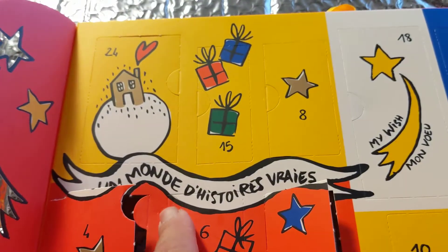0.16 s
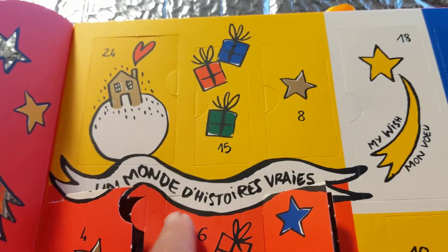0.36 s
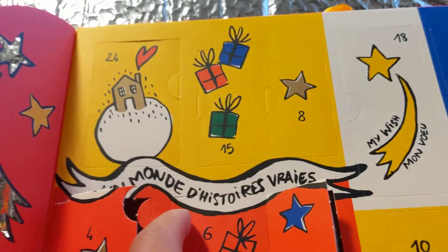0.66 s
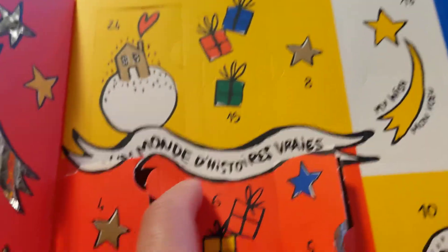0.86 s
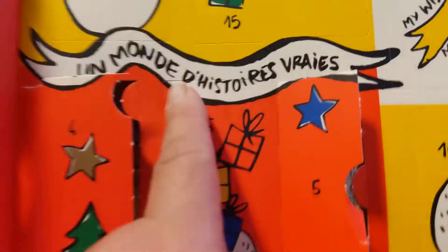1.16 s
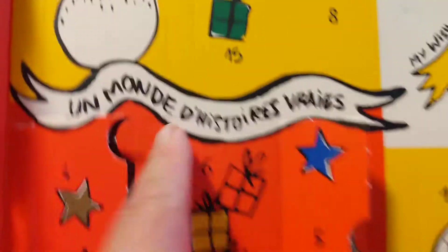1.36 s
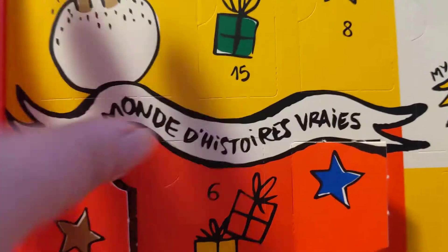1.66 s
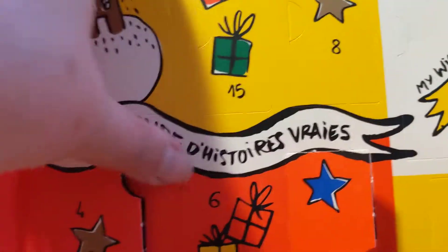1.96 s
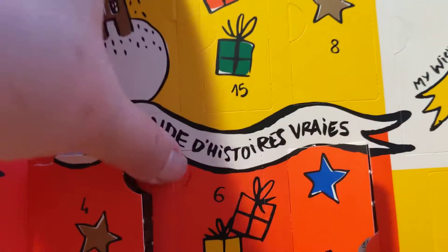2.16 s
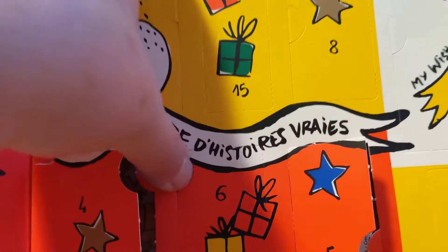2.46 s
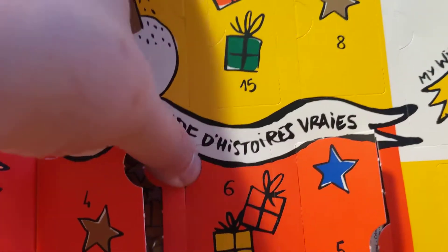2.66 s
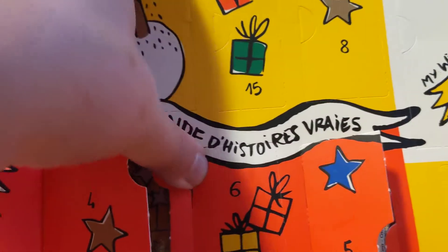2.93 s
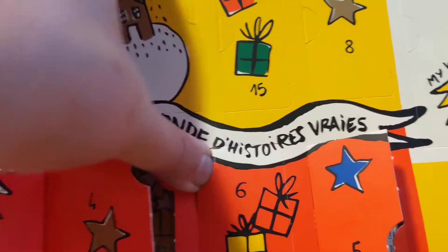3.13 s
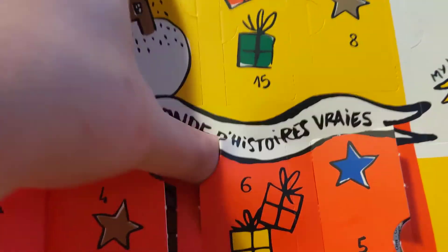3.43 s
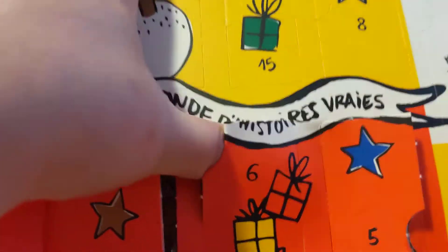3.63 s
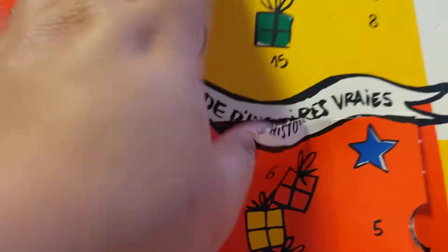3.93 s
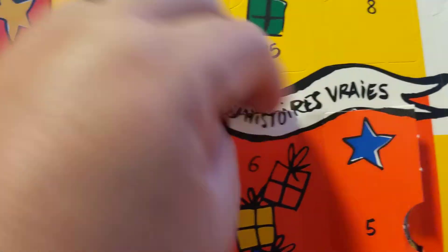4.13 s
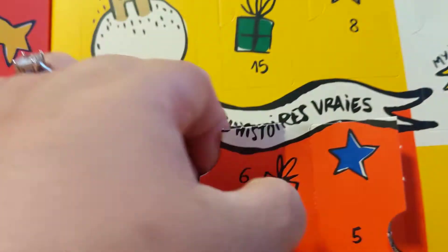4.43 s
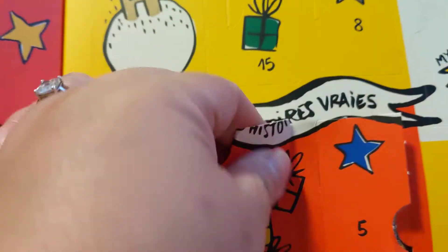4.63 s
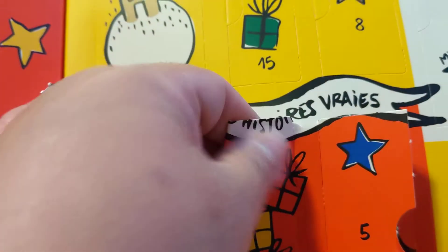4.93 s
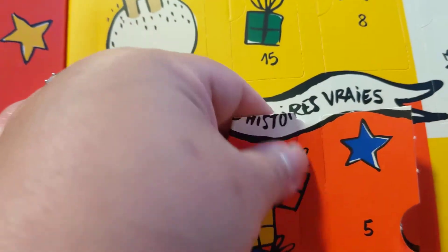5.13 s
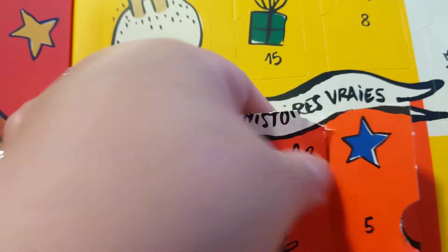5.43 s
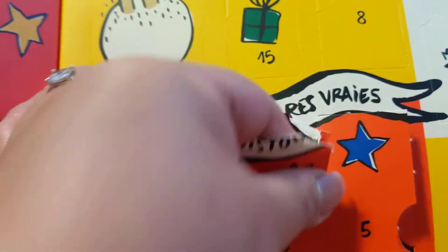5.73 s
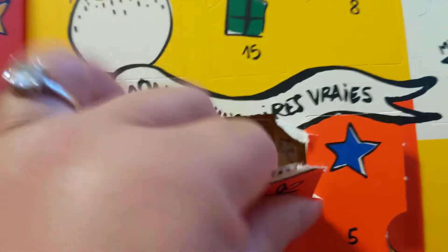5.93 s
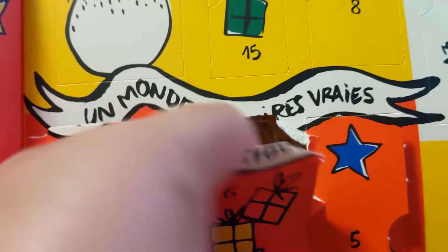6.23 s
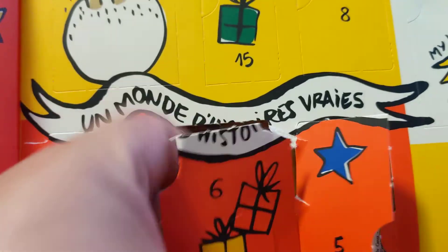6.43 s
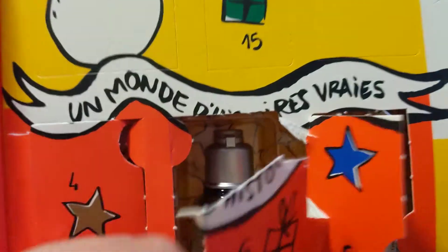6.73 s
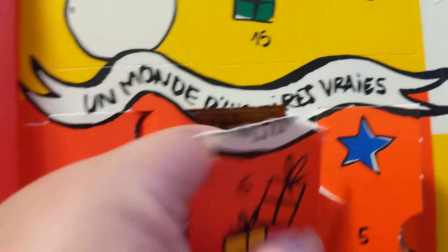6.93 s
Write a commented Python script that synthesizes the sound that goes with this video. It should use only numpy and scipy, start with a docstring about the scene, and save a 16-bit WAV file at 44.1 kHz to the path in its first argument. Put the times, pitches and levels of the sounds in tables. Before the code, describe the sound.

A thumb rubs and pries open a perforated cardboard flap, with faint ticks building to bunches of sharp snaps, close up.

```python
"""A thumb pries a perforated flap out of a cardboard box lid, close to a microphone pair in a small room.
From the start, skin rubs on the card and fibres tick over quiet room air. Paper bridges snap, faintly at
first, ringing the flap and the hollow box; near surfaces return each snap ahead of a short room tail.
At 2 s comes the first of four small squeaks on the gloss. Loud snaps arrive in bunches from 2.6 s,
among harder scrapes; the last bunch falls around 6.6 s."""
import sys
import numpy as np
from scipy import signal
from scipy.io import wavfile
from scipy.ndimage import uniform_filter1d

SR = 44100
rng = np.random.default_rng(int(sys.argv[2]) if len(sys.argv) > 2 else 0)


def file_out(sig):
    """Save sig as 16-bit WAV at sys.argv[1]."""
    # one column per channel
    cols = np.atleast_2d(sig).T
    # limit, then scale
    lim = np.clip(cols, -1, 1)
    pcm = np.round(lim * 32767).astype(np.int16)
    wavfile.write(sys.argv[1], SR, pcm)


N = 312624


def gain_of(db):
    return 10 ** (np.asarray(db) / 20)


def unit_rms(x):
    return x / np.sqrt(np.mean(x ** 2) + 1e-20)


def unit_peak(x):
    return x / (abs(x).max() + 1e-12)


def curve_at(points, hz):
    """Straight lines on a log-frequency axis."""
    point_hz, value = np.transpose(points)
    return np.interp(np.log(hz + 1), np.log(point_hz + 1), value)


def add(mix, start_s, sound):
    at = round(start_s * SR)
    part = mix[:, at:at + sound.shape[1]]
    part += sound[:, :part.shape[1]]


def ring(x, modes):
    """Two-pole resonances of alternating sign, each given as pitch_hz, width_hz, gain_db."""
    out = 0
    for k, (hz, width, db) in enumerate(modes):
        r = np.exp(-np.pi * max(width, 5) / SR)
        poles = [1, -2 * r * np.cos(2 * np.pi * hz / SR), r * r]
        out = out + (-1) ** k * gain_of(db) * (1 - r) * signal.lfilter([1, 0, -1], poles, x)
    return out


# How alike the two microphones hear a sound: frequency_hz, likeness_ratio
MIC_LIKENESS = [(60, 0.97), (180, 0.96), (550, 0.64), (1650, 0.31), (4970, 0.12), (15000, 0.046)]
def at_mics(x, colour, patchy_db=0):
    """Colour noise, with optional drifting patches; the bass is nearly the same at both microphones."""
    hz, t, z = signal.stft(x, SR, nperseg=1024)
    alike = np.clip(curve_at(MIC_LIKENESS, hz), 0, 1)[:, None]
    patches = rng.standard_normal((len(t), len(hz))).T
    patches = unit_rms(uniform_filter1d(uniform_filter1d(patches, size=30, axis=0), size=9, axis=1))
    pair = np.array([z[0], alike * z[0] + np.sqrt(1 - alike ** 2) * z[1]])
    pair *= gain_of(curve_at(colour, hz)[:, None] + patchy_db * patches)
    return unit_rms(signal.istft(pair, SR, nperseg=1024)[1][:, :N])


# Spectrum of the quiet room: frequency_hz, density_db
AIR_COLOUR = [(25, 0.5), (50, -15), (200, -23), (624, -25), (988, -19), (2990, -22), (3430, -53),
              (16000, -44)]
def room_air():
    """Faint, steady room tone all around the microphones."""
    return gain_of(-61) * at_mics(rng.standard_normal((2, N)), AIR_COLOUR)


# Skin resting and sliding on the lid: time_s, rub_db, hiss_db
THUMB_CONTACT = [(0.0, -66.5, -64), (0.3, -67, -81), (0.753, -60.5, -70.5), (1.003, -54.5, -63),
                 (1.369, -64, -70.5), (1.559, -52.5, -58), (2.102, -48, -58.5), (2.3, -56.5, -70.5),
                 (2.509, -50, -63), (3.051, -51.5, -65.5), (3.679, -49, -57.5), (4.57, -58, -71),
                 (5.108, -48.5, -60.5), (5.501, -77, -85), (6.0, -48.5, -59), (6.226, -57, -63.5),
                 (6.6, -47, -58), (7.086, -55, -65)]
# Single scrapes of the thumb: peak_s, length_s, rub_db, hiss_db, rumble_db
THUMB_SCRAPES = [(0.056, 0.089, -55, -64, -67), (0.393, 0.053, -56.5, -69, -68),
                 (0.833, 0.059, -46.5, -55.5, -54), (0.906, 0.05, -47.5, -71, -65),
                 (1.465, 0.1, -50.5, -79, -79), (1.689, 0.073, -44, -42, -70),
                 (1.756, 0.024, -35.5, -55, -46), (2.433, 0.12, -45, -65, -51), (2.937, 0.1, -43, -70, -48),
                 (3.229, 0.17, -44.5, -45.5, -51.5), (3.405, 0.049, -41.5, -69, -39),
                 (3.522, 0.22, -49, -46, -50), (3.66, 0.2, -45, -69, -64), (3.886, 0.042, -45, -53.5, -54),
                 (4.132, 0.54, -42.5, -53, -50), (4.218, 0.11, -37, -63, -41.5),
                 (4.348, 0.045, -39.5, -54, -52), (4.501, 0.065, -39, -56, -47),
                 (4.612, 0.073, -44, -53, -53), (5.378, 0.087, -34.5, -46, -38),
                 (5.636, 0.36, -49, -59, -53.5), (5.862, 0.14, -44, -53, -53),
                 (6.055, 0.066, -36.5, -54, -43), (6.259, 0.066, -45, -52.5, -71),
                 (6.328, 0.09, -41.5, -52.5, -51), (6.723, 0.11, -40.5, -43.5, -64),
                 (6.953, 0.049, -53, -52, -55)]
def thumb_levels():
    """Rub, hiss and rumble levels in dB: steady contact plus the scrapes, summed as power."""
    rise_share, swell_db = 0.42, 12
    t = np.arange(0, N + 64, 64) / SR
    times, rub_db, hiss_db = np.transpose(THUMB_CONTACT)
    rumble_db = -60 + 0.6 * (rub_db + 56.5)
    power = gain_of([np.interp(t, times, db) for db in (rub_db, hiss_db, rumble_db)]) ** 2
    for peak_s, length_s, *levels_db in THUMB_SCRAPES:
        from_peak = np.maximum((peak_s - t) / rise_share, (t - peak_s) / (1 - rise_share)) / length_s
        power += gain_of(np.array(levels_db)[:, None] - swell_db * from_peak) ** 2
    return [np.interp(np.arange(N) / SR, t, 10 * np.log10(p)) for p in power]


def stick_slip(per_s, spread_db, decay_s, cap=3.8):
    """Loudness of uneven contact: random slips of different size, each dying quickly."""
    sizes = gain_of(spread_db * np.minimum(rng.exponential(1, N), cap))
    slips = sizes * (rng.random(N) < per_s / SR)
    return unit_rms(signal.lfilter([1], [1, -np.exp(-1 / (decay_s * SR))], slips))


# Close-up spectra of rubbed card, handling rumble and skin hiss: frequency_hz, density_db
RUB_COLOUR = [(290, -69), (500, -10), (802, 5), (1530, 3), (1950, -4), (2650, -3.5), (3230, 2.5),
              (4800, -5), (5720, 1.5), (6900, -24), (8970, -54.5), (15200, -120)]
RUMBLE_COLOUR = [(25, 11.5), (75, -6), (129, 6), (213, 2.5), (260, 7.5), (500, -4.5), (650, -10),
                 (1100, -120)]
HISS_COLOUR = [(3820, -6), (6500, -2.5), (7590, 1.5), (10600, -1.5), (13800, 2.5), (15200, -1.5),
               (16000, -26)]
# Lift of the top of the hiss: time_s, gain_db
HISS_LIFT = [(0, -4), (3.6, -5), (4.45, 8), (4.8, 4), (6.3, 4.5), (7.09, 0)]
def thumb_rubbing(rub_db, hiss_db, rumble_db):
    """Skin drags over card close to the microphones: crackly body, low rumble and fine hiss."""
    slips = stick_slip(per_s=310, spread_db=1, decay_s=0.0086)
    bumps = stick_slip(per_s=32, spread_db=5.5, decay_s=0.0098)
    rub_noise, rumble_noise, hiss_noise = rng.standard_normal((3, 2, N))
    knocks = stick_slip(per_s=270, spread_db=12, decay_s=0.0053)  # slips that shake the whole flap
    deep = signal.lfilter(*signal.butter(3, 2200, fs=SR), rub_noise)
    scrape = deep * (0.35 + knocks) + (rub_noise - deep) * (0.38 + slips)
    body = gain_of(rub_db + 2) * at_mics(scrape, RUB_COLOUR, patchy_db=3)
    rumble = gain_of(rumble_db) * at_mics(rumble_noise * (1.66 + bumps), RUMBLE_COLOUR)
    hiss = gain_of(hiss_db + 5.5) * at_mics(hiss_noise * (0.5 + slips), HISS_COLOUR, patchy_db=1)
    top = signal.filtfilt(*signal.butter(3, 12800, "high", fs=SR), hiss)
    lift = gain_of(np.interp(np.arange(N) / SR, *np.transpose(HISS_LIFT)))
    return body + rumble + hiss + top * (lift - 1)


# Resonances heard close to the box: pitch_hz, width_hz, gain_db
LID_MODES = [(801, 700, -12)]  # the lid around the flap
BOX_MODES = [(53.6, 48, -12), (145.7, 32, -6), (236.5, 71, -3), (494, 330, -4.5)]  # air and walls of the box
CARD_MODES = [(2344, 133, 2.5), (3026, 770, 6), (3222, 498, 9.5), (3680, 540, 2), (4023, 333, 1.5),
              (5640, 410, 0)]  # the sheet of card
CRACK_MODES = [(7460, 1700, 10), (10930, 670, 11.5), (13400, 22000, 2.5)]  # breaking fibres
def bridge_snap(flap_hz, thump_db, card_db, crack_db):
    """A paper bridge parts in a few milliseconds; box, card and crack are set relative to the flap."""
    t = np.arange(3000) / SR
    shared, per_mic = rng.standard_normal(len(t)), rng.standard_normal((2, len(t)))
    parting_s = 0.0022 + 0.0054 / (1 + gain_of(card_db))  # thin, bright bridges part fastest
    burst = (1 - np.exp(-(t / 0.0013) ** 2)) * np.exp(-(t / parting_s) ** 2)
    strain = 0.5 * np.exp(-((t - 0.0009) / 0.00051) ** 2)  # the flap bends
    release = 2.24 * np.exp(-((t - 0.0014) / 0.00008) ** 2)  # then springs free
    kick = (1.76 * shared + 1.4 * per_mic) * burst + release - strain
    flap = ring(ring(kick, [(flap_hz, 560, 0)] + LID_MODES), [(1190, 2000, 0)])
    push = np.exp(-((t - 0.0015) / 0.00075) ** 2)
    thump = ring(push + 1.4 * per_mic * burst, BOX_MODES)
    parting = (0.1 * shared + 3.9 * per_mic) * burst  # short waves reach each microphone differently
    bent_modes = np.array(CARD_MODES) * [1 + 0.039 * rng.standard_normal(), 1, 1]  # bending retunes it
    card = ring(parting * burst ** 0.59, bent_modes) + 0.18 * ring(parting, [(3600, 6040, 0.013)])
    crack = ring(ring(parting * burst ** 2, CRACK_MODES), [(12500, 4500, 0)])
    parts = [(flap, 0), (thump, thump_db), (card, card_db), (crack, crack_db)]
    return sum(gain_of(db) * unit_peak(part) for part, db in parts)


# Paper bridges giving way: time_s, level_db, flap_hz, thump_db, card_db, crack_db
BRIDGE_SNAPS = [(0.022, -36, 1300, -7.5, -27.5, -16), (0.204, -50, 900, 0, -16, -23),
                (0.231, -49.5, 894, -22, 16, -14), (0.256, -60, 1450, -18, 4, 6),
                (0.265, -37.5, 1550, -28, 4, -3), (0.336, -44, 1690, -39, 7.5, -3),
                (0.356, -36.5, 1680, -16.5, -26.5, -8), (0.408, -36, 1410, -12, -12, -12),
                (0.501, -35.5, 1320, -17, -2.5, -22), (0.682, -47, 1100, -15, 4, -3),
                (0.775, -52.5, 1310, -13, 15, 11), (0.79, -44, 960, -10, 10.5, 13),
                (0.862, -27, 1100, -21, -7.5, -28), (0.891, -35.5, 1360, -13, -8, -6),
                (0.932, -35, 1250, -36, -3, -5), (0.956, -33.5, 1260, -26, -17, -33),
                (1.144, -54.5, 800, 0, 16, 24.5), (1.398, -36.5, 1240, -33, -2, -13),
                (1.558, -37.5, 1420, -12.5, 8, 1), (1.711, -31, 870, -12, 5.5, -16),
                (1.938, -32.5, 1350, -13, -2, -5), (1.99, -35, 1240, -17.5, -21, -22),
                (2.26, -36, 953, -8.5, 2, -10), (2.365, -39, 840, 0, -7, -17),
                (2.373, -49, 1300, -23, 5, 19.5), (2.383, -34, 1380, -20, 1, 1),
                (2.51, -55, 1300, -20, 0, 25), (2.571, -6, 980, -17.5, -9.5, -18),
                (2.869, -17.5, 1300, -22.5, -5.5, -29), (2.933, -18.5, 1440, -32, -15, -35),
                (2.948, -17.5, 1340, -40, 1.5, -2), (2.97, -16, 1280, -22, -0.5, -36),
                (3.008, -30, 1720, -11, 3, 2.5), (3.081, -15.5, 1200, -26, -7, -32),
                (3.091, -12, 1160, -24, -4, -19), (3.176, -18, 1450, -44, -13, -36),
                (3.507, -13, 1400, -10.5, 2.5, -8), (3.513, -14, 970, -24, -10, -20),
                (3.519, -2.5, 1770, -21, -1, -35), (3.595, -2.5, 1190, -21, -4, -28),
                (3.704, -0.5, 1270, -14.5, -6, -10.5), (3.881, -34, 1410, -13.5, -3, -18),
                (3.966, -26, 950, -18, -22, -14), (3.996, -15, 870, -3.5, -12.5, -22),
                (4.188, -22, 1300, -8.5, -3, -20), (4.196, -21, 1490, -19, -19, -23),
                (4.216, -18, 1470, -36, -8, -11), (4.23, -22.5, 810, -4, -7, -9),
                (4.351, -33.5, 790, -2, -19, -6), (4.521, -23.5, 1370, -9, -1, -24),
                (4.597, -32, 1440, -13, 0.5, -8), (4.645, -24.5, 1460, -13.5, 3.5, -4),
                (4.653, -28.5, 1270, -2.5, 3.5, 3.5), (4.721, -49.5, 800, 12, -15, -25),
                (4.754, -34, 1290, -10, -6.5, -43), (4.902, -35.5, 1220, -2.5, -8, -4),
                (5.023, -4, 1170, -17.5, -4, -6.5), (5.331, -40, 894, -29, -7, 4),
                (5.361, -28, 1400, -23, -9, 1), (5.386, -13, 1400, -24.5, 5, -2),
                (5.582, -21.5, 1220, -11.5, -7, -23), (5.644, -14, 1390, -14, -15, -18),
                (5.864, -28, 910, -14.5, -10, -1.5), (5.954, -25.5, 1630, -20, -0.5, -21),
                (6.001, -29.5, 1370, -18, -8, -25), (6.067, -21, 800, -5.5, -26, -20),
                (6.121, -17.5, 1280, -12, -7.5, -15), (6.369, -32.5, 1150, -9.5, -23, -34),
                (6.442, -22.5, 996, -13.5, -9.5, -24), (6.494, -4, 1510, -16, -1.5, -18),
                (6.545, -4, 1390, -21.5, -4.5, -15), (6.589, -5, 1350, -19.5, -2, -15),
                (6.731, -4.5, 1360, -16, -3, -23), (7.01, -32, 1020, -17, -28, -13),
                (7.05, -27, 1660, -13.5, -5.5, -17)]
def tearing_perforation():
    """The bridges break one after another, heard direct at close range."""
    out = np.zeros((2, N))
    for time_s, level_db, *timbre in BRIDGE_SNAPS:
        add(out, time_s - 0.001, gain_of(level_db + 2.5) * bridge_snap(*timbre))
    return out


# Surfaces near the box: delay_s, level_db
NEAR_ECHOES = [(.0047, -30), (.0088, -15.5), (.0127, -30.5)]
# Tail of the small room: frequency_hz, t60_s, level_db
ROOM_DECAY = [(100, 0.15, 0.5), (620, 0.11, 5), (1510, 0.15, -3.5), (2840, 0.19, -5), (5400, 0.26, -10.5),
              (13000, 0.15, -3)]
def room_response():
    """A few near reflections, then sparse far ones dying band by band."""
    taps = np.zeros((2, SR // 2))
    slots = np.arange(340, SR // 2 - 20, 20)
    arrivals = slots + rng.integers(0, 20, (2, len(slots)))
    np.put_along_axis(taps, arrivals, rng.choice([-1., 1.], arrivals.shape), 1)
    hz, t, z = signal.stft(taps, SR, nperseg=256)
    bands = np.array(ROOM_DECAY)
    t60_s, level_db = curve_at(bands[:, :2], hz)[:, None], curve_at(bands[:, ::2], hz)[:, None]
    left, right = signal.istft(z * gain_of(level_db - 60 * t / t60_s), SR, nperseg=256)[1]
    right += signal.filtfilt(*signal.butter(1, 900, fs=SR), left - right)  # long waves arrive alike
    out = gain_of(-9) * np.array([left, right]) / np.linalg.norm(left)
    for delay_s, db in NEAR_ECHOES:
        echo = gain_of(db) * np.array([[0.8, 0.3]])
        add(out[:1], delay_s, echo)
        add(out[1:], delay_s + 0.0002, echo)
    return out


def room_reflections(direct):
    """Hand and flap keep moving, so the sound drifts between three room responses."""
    drift_hz = 7
    phase = np.pi * drift_hz * np.arange(N) / SR
    shares = [np.sqrt(2 / 3) * abs(np.cos(phase + k * np.pi / 3)) for k in range(3)]
    distant = direct - 0.45 * ring(direct, [(1150, 730, 0.0094)])  # the flap is loud only close by
    return sum(signal.fftconvolve(distant * share, room_response(), axes=1)[:, :N] for share in shares)


def fibre_ticks(modes):
    """Single fibres let go at random; each click rings the card briefly."""
    envelope = stick_slip(per_s=45, spread_db=2.3, decay_s=0.00071, cap=3)
    clicks = rng.standard_normal((2, N)) * envelope
    return unit_rms(ring(clicks + 0.71 * clicks[::-1], modes))  # each reaches both microphones


def fibre_crackle(rub_db, hiss_db):
    """Ticks in flap and card follow the rubbing level; the brightest follow the hiss."""
    flap = gain_of(rub_db - 11) * fibre_ticks([(1400, 450, 0)] + LID_MODES)
    card = gain_of(rub_db - 13) * fibre_ticks(CARD_MODES)
    crack = gain_of(hiss_db - 5.5) * fibre_ticks(CRACK_MODES)
    return flap + card + crack


# Skin or nail singing on the glossy lid: start_s, length_s, pitch_hz, level_db
GLOSS_SQUEAKS = [(1.99, 0.14, 3160, -56), (2.631, 0.24, 3900, -52), (4.479, .035, 3600, -50),
                 (4.579, 0.08, 1496, -47)]
def gloss_squeaks():
    """Quick regular slips give a fuzzy, slightly rising tone."""
    out = np.zeros((2, N))
    for start_s, length_s, pitch_hz, level_db in GLOSS_SQUEAKS:
        t = np.arange(0, length_s, 1 / SR)
        noise = rng.standard_normal((2, len(t))) + 1j * rng.standard_normal((2, len(t)))
        fuzz = uniform_filter1d(noise, 100)
        tone = ((fuzz + fuzz[0]) * np.exp(2j * np.pi * pitch_hz * t * (1 + 0.06 * t))).real
        swell = np.sin(np.pi * t / length_s) ** 0.5
        add(out, start_s, gain_of(level_db) * unit_rms(tone) * swell)
    return out


def scene():
    """Everything at the microphone pair; only the snaps carry into the room."""
    snaps = tearing_perforation()
    air = room_air()
    reflections = room_reflections(snaps)
    rub_db, hiss_db, rumble_db = thumb_levels()
    rubbing = thumb_rubbing(rub_db, hiss_db, rumble_db)
    return air + rubbing + snaps + reflections + fibre_crackle(rub_db, hiss_db) + gloss_squeaks()


def record(dry):
    """The recorder clips at full scale, then cuts the highest treble."""
    cutoff_hz = 16200
    lowpass = signal.firwin(511, cutoff_hz, window=("kaiser", 9), fs=SR)
    return signal.oaconvolve(np.clip(dry, -1, 1), lowpass[None], "same")


dry = scene()
out = record(dry)
file_out(out)
```